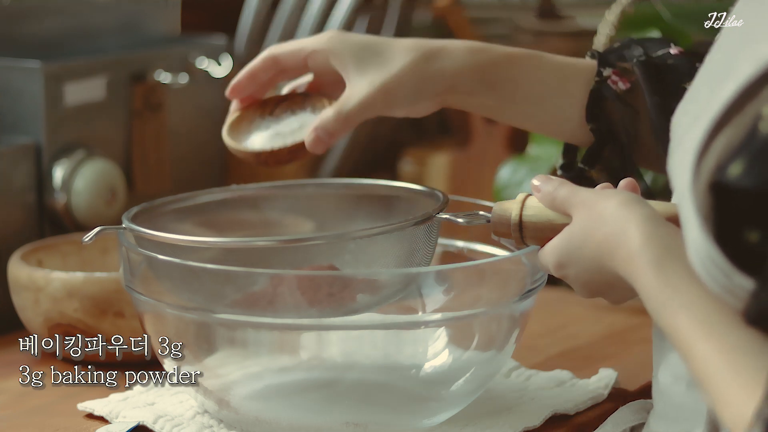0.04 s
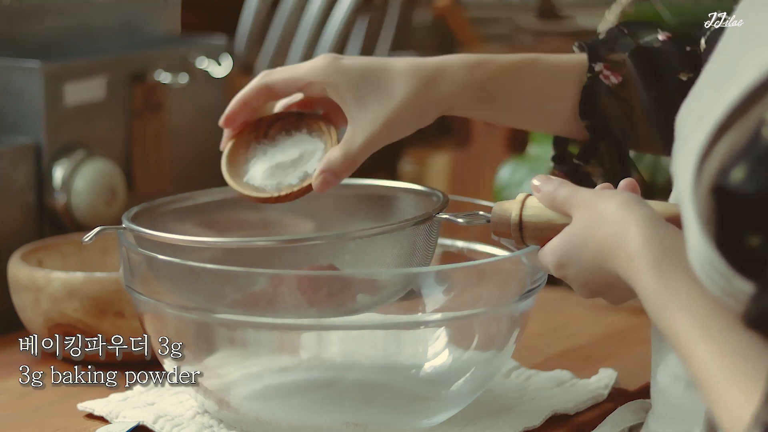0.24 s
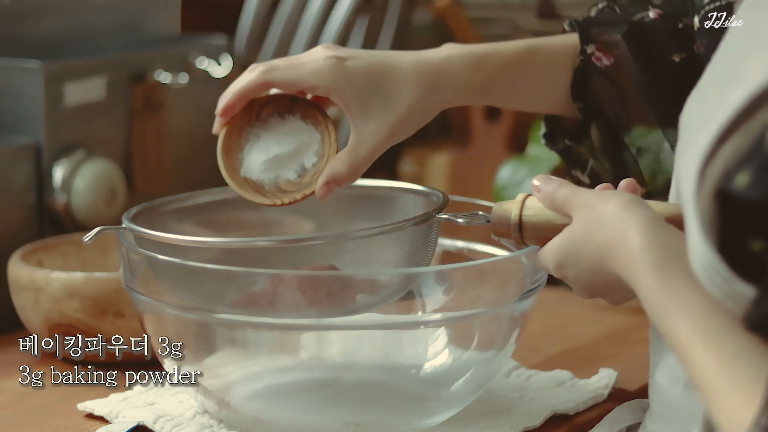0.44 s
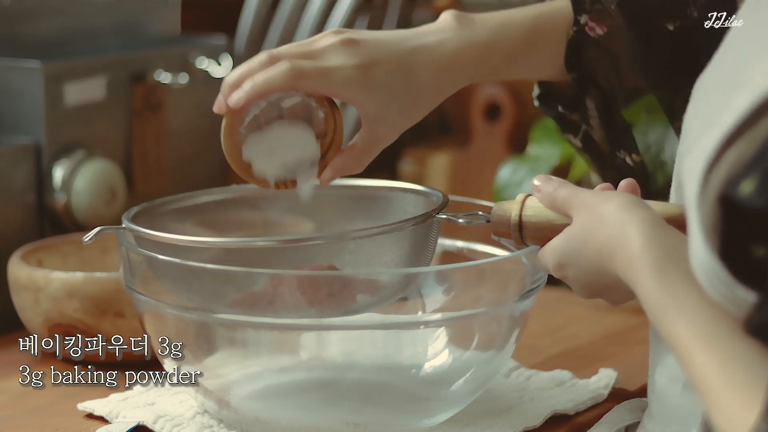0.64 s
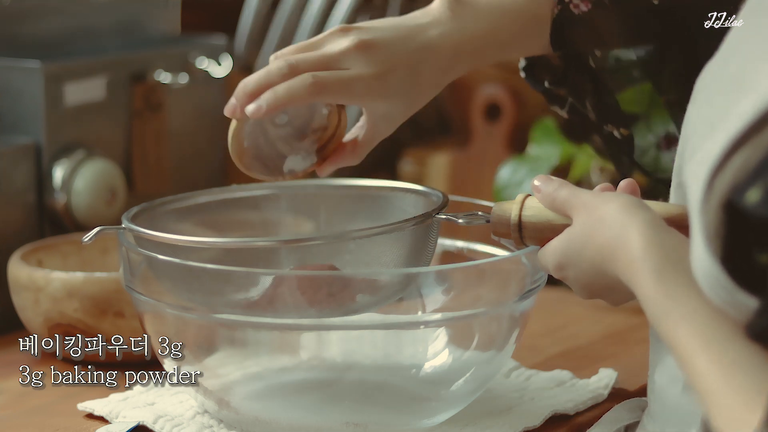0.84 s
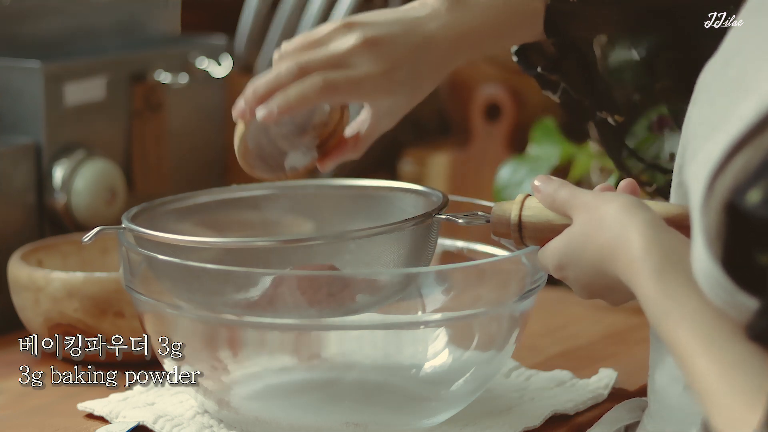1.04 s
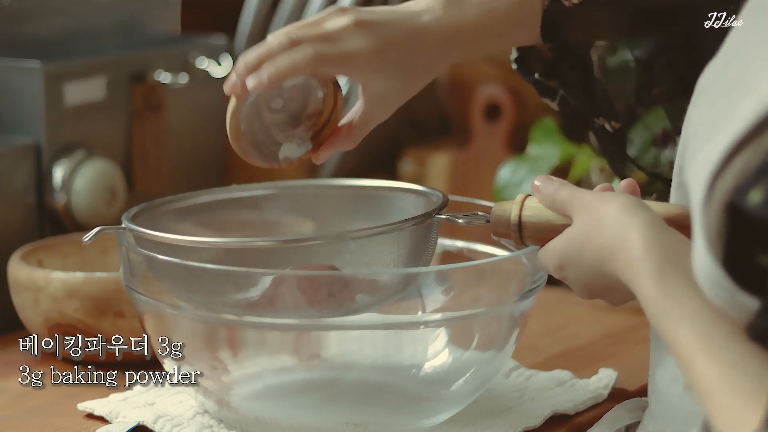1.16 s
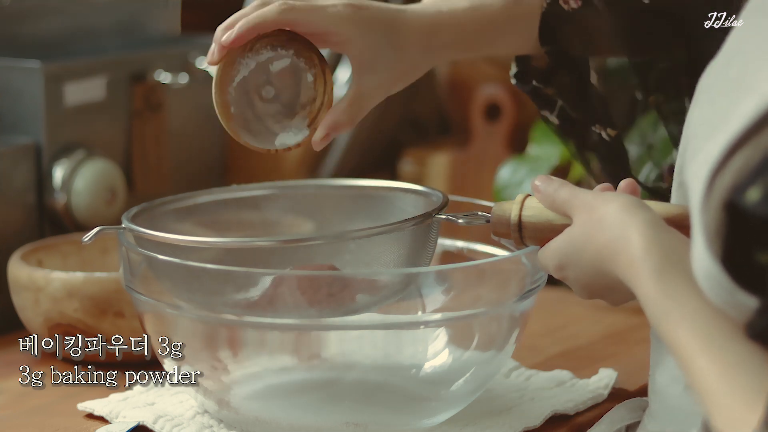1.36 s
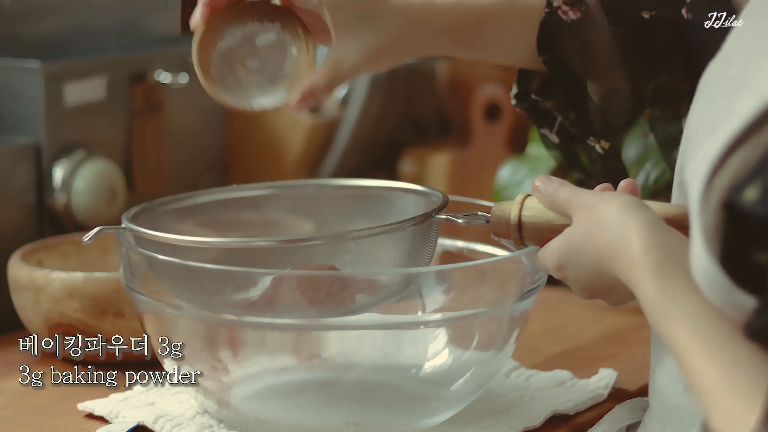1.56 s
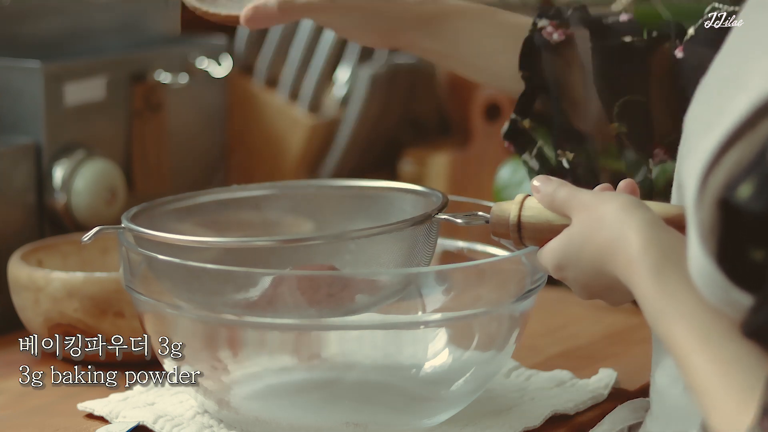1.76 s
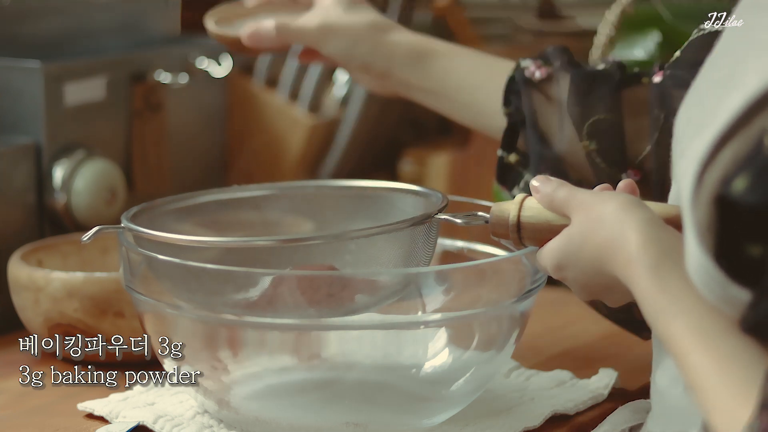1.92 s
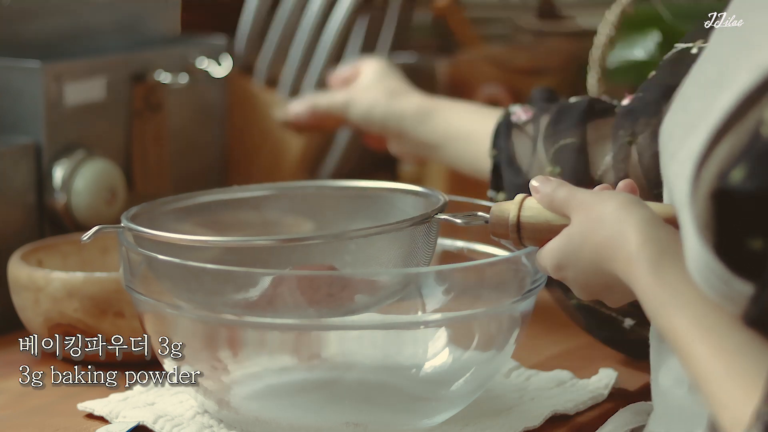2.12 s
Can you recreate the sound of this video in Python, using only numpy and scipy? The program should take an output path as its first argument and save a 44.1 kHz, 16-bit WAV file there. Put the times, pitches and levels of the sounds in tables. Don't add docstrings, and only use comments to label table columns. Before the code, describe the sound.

Fine powder falls in short grainy gusts onto a wire sieve, strongest near one second, then thins to faint metallic rubbing on glass; dull low thumps throughout, close microphone in a quiet kitchen.

```python
import sys
import numpy as np
from scipy import signal
from scipy.fft import rfft, irfft
from scipy.io import wavfile
from scipy.ndimage import uniform_filter1d

SR = 44100
rng = np.random.default_rng(int(sys.argv[2]) if len(sys.argv) > 2 else 0)


def waveform_to_disk(signal):
    frames = np.transpose(np.atleast_2d(signal))
    scaled = np.clip(frames, -1, 1) * 32767
    samples = np.round(scaled).astype(np.int16)
    wavfile.write(sys.argv[1], SR, samples)


def magnitude_from_level(level_db):
    exponent = np.asarray(level_db, float) / 20
    return 10 ** exponent


N = 96490
HALF = SR // 2


def rms_one(x):
    return x / np.sqrt(np.mean(x ** 2) + 1e-20)


def colour(x, points, tilt_db=0.):
    hz = np.maximum(np.arange(len(x) // 2 + 1) * SR / len(x), 1)
    table = np.array(points)
    db = np.interp(np.log(hz), np.log(table[:, 0]), table[:, 1], left=-90, right=-90)
    db = db + tilt_db * np.log2(hz / 4000)
    return rms_one(irfft(rfft(x) * magnitude_from_level(db), len(x)))


def resonate(x, hz, width_hz):
    r = np.exp(-np.pi * width_hz / SR)
    return rms_one(signal.lfilter([1, 0, -1], [1, -2 * r * np.cos(2 * np.pi * hz / SR), r * r], x))


def envelope(length, attack, release):
    t = np.arange(HALF) / SR
    return np.clip(t / attack, 0, 1) * np.exp(-np.maximum(t - length, 0) / release)


def swell(length, edge):
    t = np.arange(HALF) / SR
    edge_s = edge * length + 0.0017
    nearest_end = np.minimum(t, length + edge_s - t)
    return np.sin(np.pi / 2 * np.clip(nearest_end / edge_s, 0, 1)) ** 2


def flicker():
    return magnitude_from_level(1.2 * rms_one(uniform_filter1d(rng.standard_normal(HALF), size=700)))


def grains():
    grains_per_s, spread_db = 7000, 2.5
    size = magnitude_from_level(spread_db * np.minimum(rng.exponential(1, HALF), 5)) * rng.choice([-1, 1], HALF)
    clump = rms_one(uniform_filter1d(rng.standard_normal(HALF), size=300))
    hits = rng.random(HALF) < grains_per_s / SR
    return size * hits * magnitude_from_level(0.5 * clump)


def add(out, s, x):
    i = int(max(s, 0) * SR)
    out[i:i + len(x)] += x


# t/s, length/s, level/dB, brightness/(dB per octave)
GUSTS = [(0.0, 0.065, -57.5, -7), (0.251, 0.04, -57.5, -6.5), (0.31, 0.026, -62.5, -10),
         (0.356, 0.01, -58.5, -1.5), (0.438, 0.033, -61.5, -2), (0.501, 0.055, -57.5, -5.5),
         (0.566, 0.055, -62, -5.5), (0.711, 0.083, -59, -4.5), (0.801, 0.059, -61, -4.5),
         (0.872, 0.01, -59.5, -12), (0.902, 0.06, -59.5, -5.5), (0.97, 0.026, -58.5, -5),
         (0.994, 0.052, -50, -4), (1.05, 0.03, -56, -4.5), (1.079, 0.043, -53.5, -6),
         (1.127, 0.052, -67.5, -8.5), (1.301, 0.08, -66.5, -5), (1.409, 0.075, -68, -7),
         (1.861, 0.078, -66.5, -6), (1.969, 0.065, -65.5, 3), (2.04, 0.011, -61, 0)]
# f/Hz, level per Hz/dB
POWDER = [(530, -15), (900, -7), (1670, -8), (2100, -21.5), (2790, -0.5), (3580, 3.5), (16000, -7.5)]
# f/Hz, width/Hz, level/dB
MESH = [(1080, 1160, -17.5), (2140, 400, -2), (2500, 73, -6.5), (3020, 155, -3.5), (3530, 480, -9),
        (3826, 177, 2.5), (4180, 840, -9.5), (5500, 630, 1.5)]


def powder():
    mesh_db, vary_db = 1, .7
    out = np.zeros(N + SR)
    for s, length, db, tilt_db in GUSTS:
        gust = grains()
        vary = rng.standard_normal(len(MESH))
        mesh = 0
        for k, (hz, width, level) in enumerate(MESH):
            gain = magnitude_from_level(level + vary_db * vary[k] + tilt_db * np.log2(hz / 4000))
            mesh = mesh + gain * resonate(gust, hz, width) * (-1) ** k * flicker()
        hiss = colour(gust, POWDER, tilt_db) * swell(length, 0.18)
        ring = magnitude_from_level(mesh_db) * rms_one(mesh) * envelope(length, attack=.005, release=.014)
        add(out, s, magnitude_from_level(db - 5) * (hiss + ring))
    return out[:N]


def singing(rows):
    boost_db, evenness = 6, .25
    out = np.zeros(N + SR)
    for s, length, db, hz, width in rows:
        ring = resonate(resonate(grains(), hz, width), hz, 2.0 * width)
        ring = ring / (uniform_filter1d(ring ** 2, size=500) + .05) ** evenness
        shape = swell(length, 0.24)
        steady = np.sqrt(np.sum(shape ** 2) / np.sum((ring * shape) ** 2))
        add(out, s, magnitude_from_level(db + boost_db) * ring * shape * steady)
    return out[:N]


# t/s, length/s, level/dB, f/Hz, width/Hz
WIRES = [(.02, 0.088, -80, 3040, 200), (.252, 0.049, -79, 5600, 500), (.27, 0.015, -70, 3670, 400),
         (.312, .01, -68, 4000, 250), (.507, 0.0057, -66, 3870, 300), (.512, .035, -73, 5850, 199),
         (.515, .035, -74, 3370, 300), (.692, .095, -71.5, 4600, 120), (.722, 0.02, -69.5, 3800, 300),
         (.75, .025, -77, 11600, 400), (.803, 0.044, -69.5, 3570, 700), (.908, 0.031, -67.5, 3070, 400),
         (.93, 0.016, -72, 5720, 400), (1.003, 0.039, -69, 2180, 500), (1.022, 0.034, -67.5, 1170, 150),
         (1.032, 0.033, -61, 3890, 160), (1.08, 0.015, -63.5, 3750, 250), (1.097, 0.014, -64.5, 3350, 303),
         (1.128, 0.018, -72, 3900, 300), (2.04, .008, -69.5, 3620, 250)]


def wires():
    return singing(WIRES)


# t/s, length/s, level/dB, second ring level/dB, low ring level/dB
SLIDES = [
    (0.424, 0.15, -79, 6, -20),
    (0.688, 0.088, -71, 2, -14),
    (1.3, 0.13, -76, 2, -30),
    (1.386, 0.12, -71, -3, -17),
    (1.587, 0.024, -73, -12, -25),
    (1.69, .05, -87, -10, -20),
    (1.856, 0.063, -70, -9, -20),
]
# f/Hz, width/Hz
RIM = [(6180, 330), (7920, 400), (4570, 70)]
# f/Hz, width/Hz, level/dB
RIM_HIGH = [(6500, 230, -6.5), (10600, 500, -16), (11500, 600, -16), (13100, 500, -18)]


def rim():
    vary_db = 2.0
    out = np.zeros(N + SR)
    for s, length, db, second_db, low_db in SLIDES:
        rub = grains()
        vary = rng.standard_normal(len(RIM_HIGH))
        rings = 0
        for (hz, width), level in zip(RIM, (0, second_db, low_db)):
            rings = rings + magnitude_from_level(level) * resonate(resonate(rub, hz, width), hz, 2.7 * width) * flicker()
        for (hz, width, level), v in zip(RIM_HIGH, vary):
            rings = rings + magnitude_from_level(level + vary_db * v) * resonate(rub, hz, width) * flicker()
        add(out, s, magnitude_from_level(db) * rings * swell(length, 0.48))
    return out[:N]


# t/s, level/dB, favoured f/Hz, length of push/s
THUMPS = [(0.0, -45, 95, 0.019), (0.061, -56.5, 222, 0.11), (0.251, -52.5, 224, 0.022),
          (0.255, -54, 96, 0.019), (.37, -50.5, 228, 0.011), (0.579, -55, 221, 0.12),
          (0.684, -41.5, 107.6, 0.056), (.695, -49, 233, 0.065), (.705, -45, 153, 0.026),
          (0.78, -42.5, 196, 0.0072), (0.811, -42.5, 106.8, 0.11), (.869, -53, 510, 0.016),
          (0.901, -50.5, 135, 0.04), (.98, -51, 91, 0.069), (1.207, -47.5, 108, 0.019),
          (1.274, -50.5, 89, 0.049), (1.369, -54.5, 91, 0.03), (1.69, -57, 241, 0.072),
          (1.986, -39, 108, 0.055), (1.99, -53, 250, 0.037), (1.995, -43, 158, 0.047),
          (2.03, -43, 230, 0.0095), (2.045, -58, 139, 0.015), (2.081, -54, 79, 0.049),
          (2.086, -46, 178, 0.056), (2.118, -54.5, 231, .06), (2.122, -40.5, 97, 0.033)]
# f/Hz, time to fall by 60 dB/s
BOARDS = [(75, 0.34), (92, 0.5), (114, 0.4), (142, 0.51), (165, 0.1), (195, 0.089), (232, 0.32),
          (265, 0.32), (500, 0.038), (590, 0.088)]


def thumps():
    focus_db = 140
    out = np.zeros(N + SR)
    t = np.arange(HALF) / SR
    for s, db, focus_hz, length in THUMPS:
        draw = rng.random((len(BOARDS), 2))
        boards = 0
        for k, (hz, t60) in enumerate(BOARDS):
            detune, start = draw[k]
            gain = magnitude_from_level(-focus_db * np.log2(hz / focus_hz) ** 2)
            cycles = hz * (1 + 0.015 * (detune - .5)) * t + 0.072 * start
            mode = gain * (-1) ** k * np.sin(2 * np.pi * cycles)
            boards = boards + mode * envelope(length, 0.0049, t60 / np.log(1000))
        rough = resonate(rng.standard_normal(HALF), 1.42 * focus_hz, 0.17 * focus_hz)
        rough = rough * envelope(length, 0.0024, 0.065)
        add(out, s, magnitude_from_level(db + 1.5) * (boards + magnitude_from_level(-15) * rough))
    return out[:N]


# t/s, length/s, level/dB, f/Hz, width/Hz
MORE_RINGS = [(.04, 0.052, -79, 3980, 400), (.325, 0.033, -78, 3680, 300), (.361, 0.0059, -73, 12000, 2500),
              (.361, 0.0057, -69.5, 2200, 500), (.522, .018, -66.5, 2270, 400), (.825, 0.027, -77, 5660, 500),
              (.84, 0.016, -74, 3470, 900), (.871, 0.0062, -69, 2840, 500), (.915, 0.027, -69, 3810, 400),
              (.998, 0.035, -70, 3840, 300), (.998, 0.029, -74, 13100, 4000), (1.01, 0.019, -74, 9200, 1200),
              (1.098, 0.023, -69.5, 4020, 300), (1.098, 0.026, -70, 2160, 400), (1.3, 0.036, -79, 8060, 400),
              (1.4, .11, -82, 13100, 900), (1.47, 0.051, -85, 11600, 500), (1.41, .1, -84, 10600, 500),
              (1.862, 0.032, -80, 11600, 500), (1.872, 0.04, -84, 10300, 400), (1.97, .008, -75, 3870, 300),
              (1.997, .005, -76, 4150, 251), (2.04, .006, -80, 7700, 500), (.45, .008, -75, 12000, 2500),
              (.725, 0.023, -74, 7840, 200), (2.05, 0.013, -76, 3640, 250), (1.022, 0.011, -65, 3620, 200),
              (1.085, 0.028, -68.5, 5200, 900), (1.04, .012, -77, 12500, 3000),
              (1.085, 0.0088, -78.5, 10600, 500), (.871, 0.0024, -73, 1100, 900), (1.03, 0.036, -68, 2100, 200)]


def more_rings():
    return singing(MORE_RINGS)


# f/Hz, level per Hz/dB
AIR = [(12, -53), (20, -25), (60, -12.5), (75, -13), (102, -14), (198, -8), (233, -7), (455, -17.5),
       (905, -25), (1030, -25), (1500, -35.5), (1950, -45.5), (3300, -120)]
# f/Hz, level per Hz/dB
HISS = [(880, -8), (1500, -6.5), (3090, -10), (3830, -9.5), (5780, -16), (6250, -15.5), (16000, -18)]
# f/Hz, level/dB
HUM = [(328.5, -65.5), (383.7, -64), (615.4, -69), (661, -75), (864, -73), (990.5, -76.5), (1823, -83),
       (495.3, -71)]


def room_tone():
    air_db, hiss_db, hum_width_hz = -53.5, -69, 5.3
    air = magnitude_from_level(air_db) * colour(rng.standard_normal(N), AIR)
    hiss = magnitude_from_level(hiss_db) * colour(rng.standard_normal(N), HISS)
    hum = sum(magnitude_from_level(db) * resonate(rng.standard_normal(N), hz, hum_width_hz) for hz, db in HUM)
    return air + hiss + hum


def scene():
    return (powder() + wires() + rim() + thumps() + more_rings() + room_tone())[None]


def roll_off(x):
    return signal.sosfilt(signal.butter(12, 15690, fs=SR, output="sos"), x)


def record(dry):
    return roll_off(dry)


dry = scene()
out = record(dry)
waveform_to_disk(out)
```